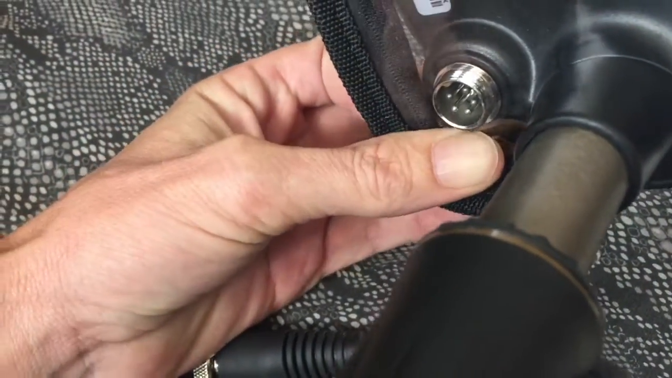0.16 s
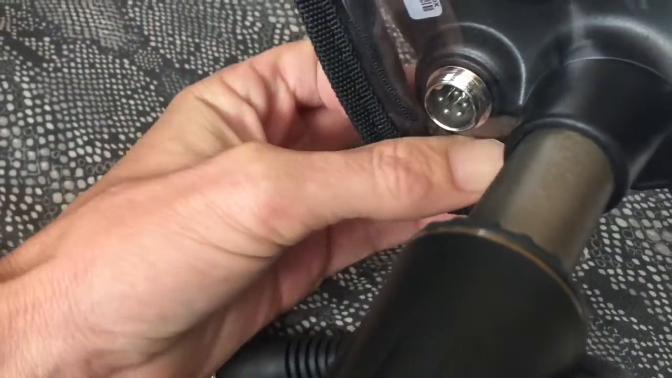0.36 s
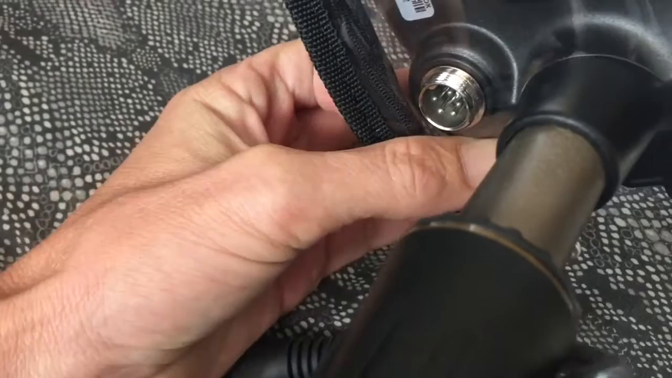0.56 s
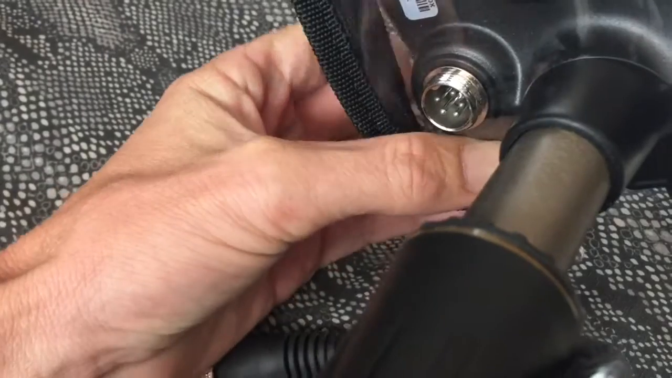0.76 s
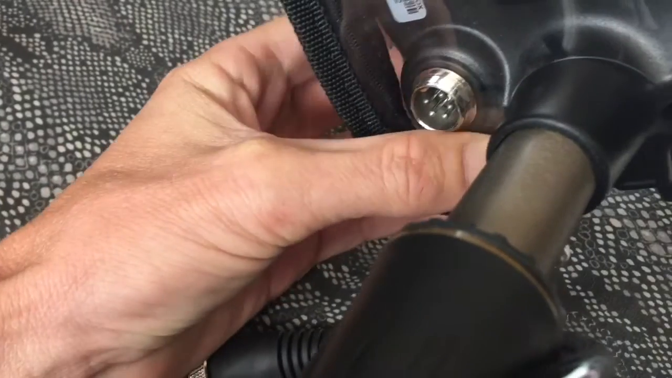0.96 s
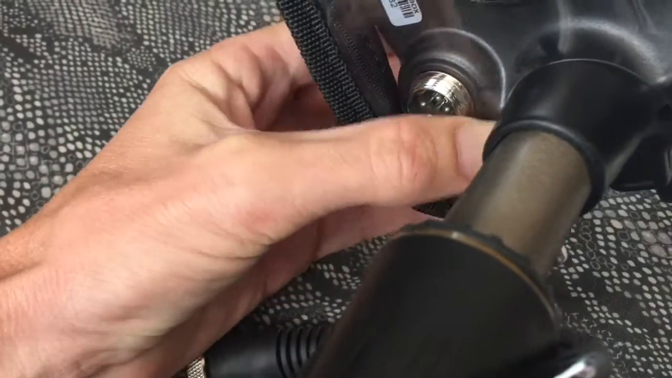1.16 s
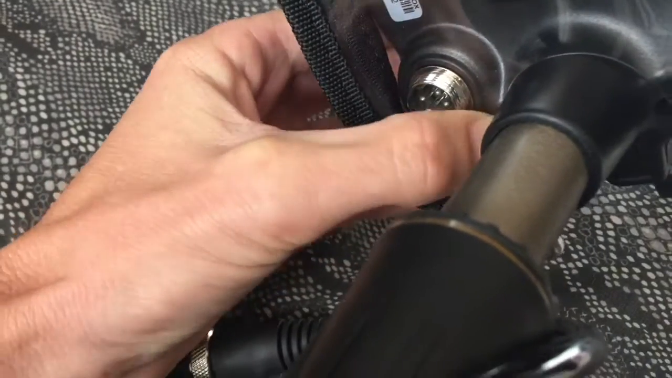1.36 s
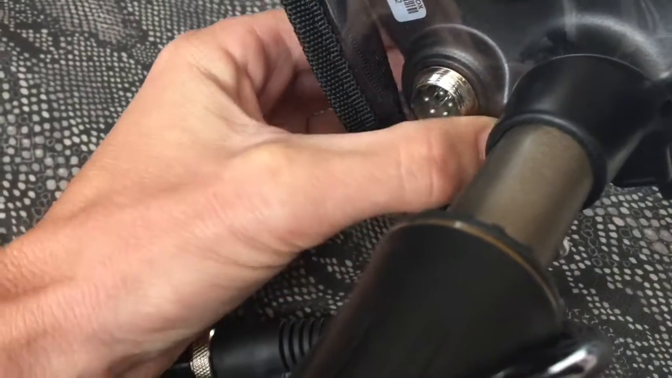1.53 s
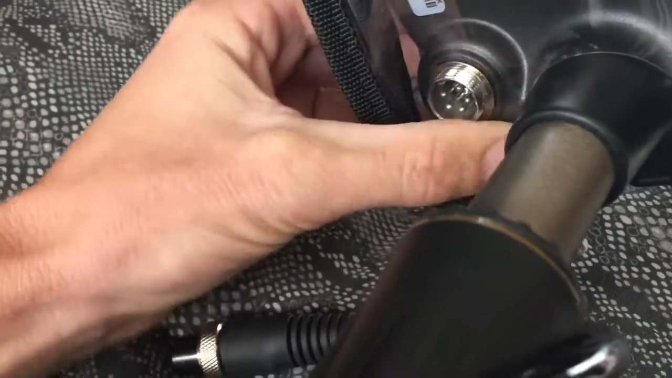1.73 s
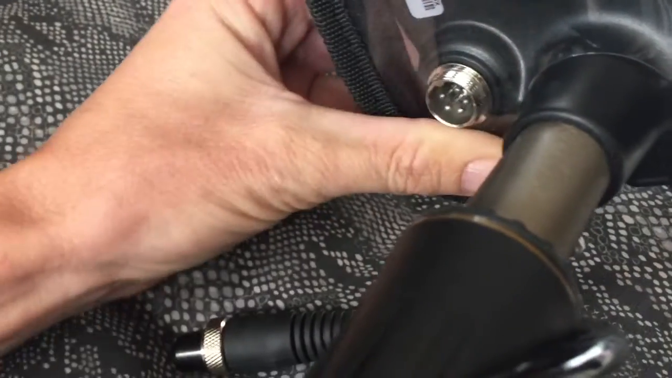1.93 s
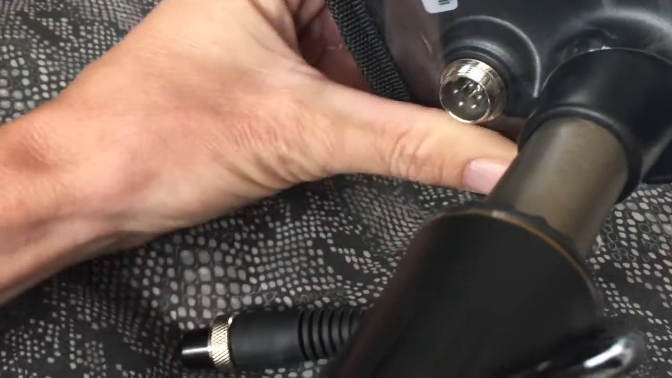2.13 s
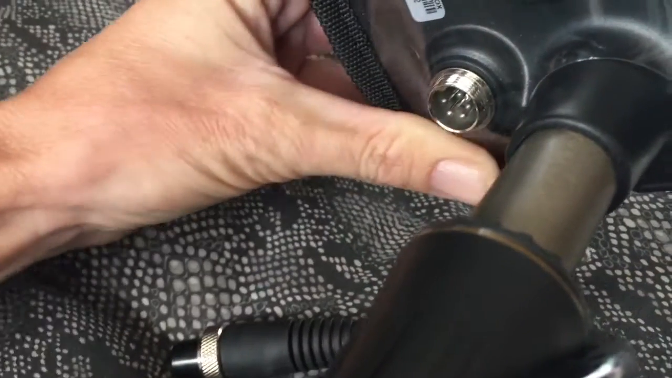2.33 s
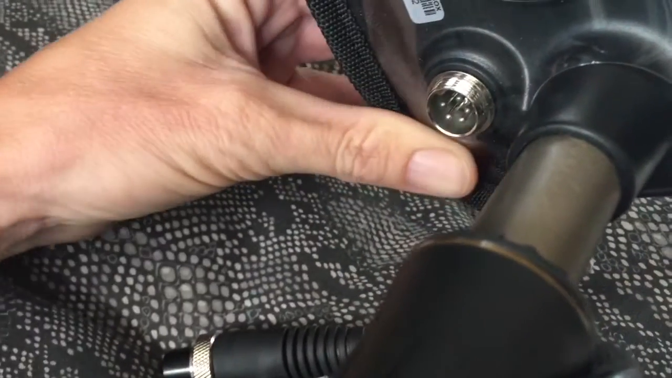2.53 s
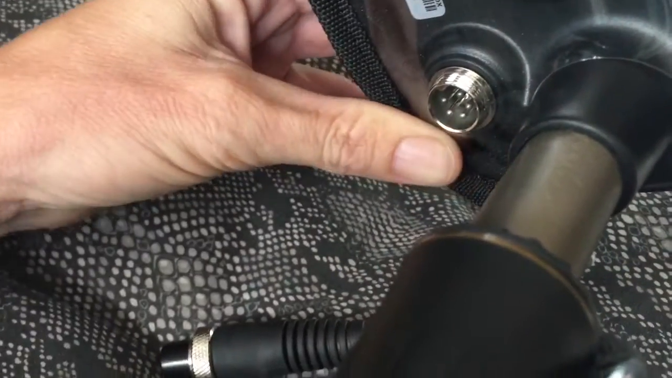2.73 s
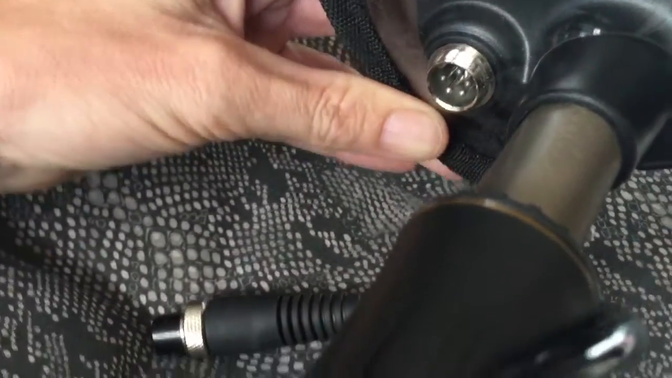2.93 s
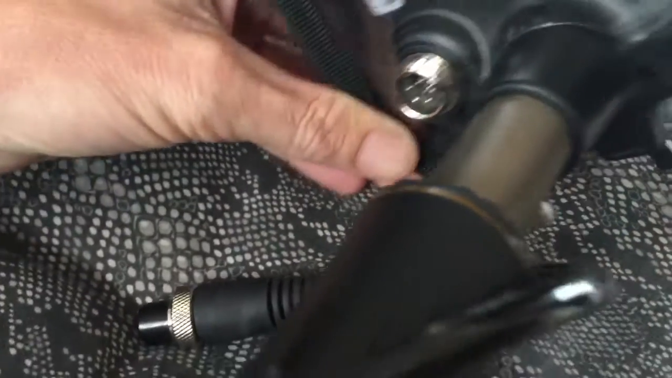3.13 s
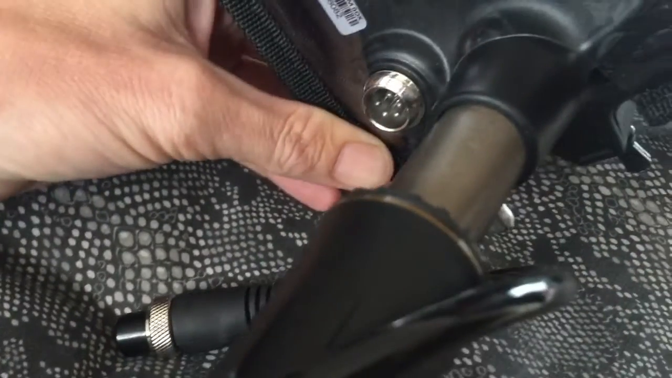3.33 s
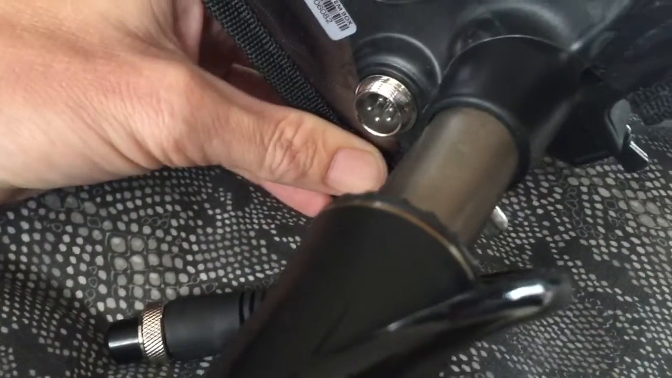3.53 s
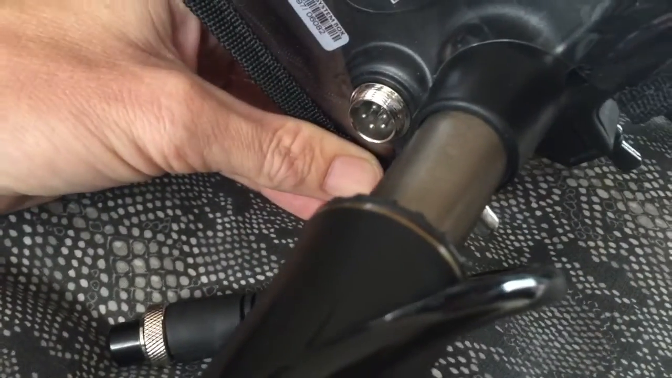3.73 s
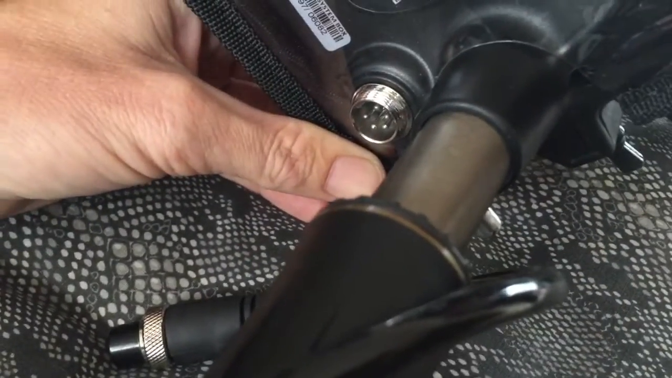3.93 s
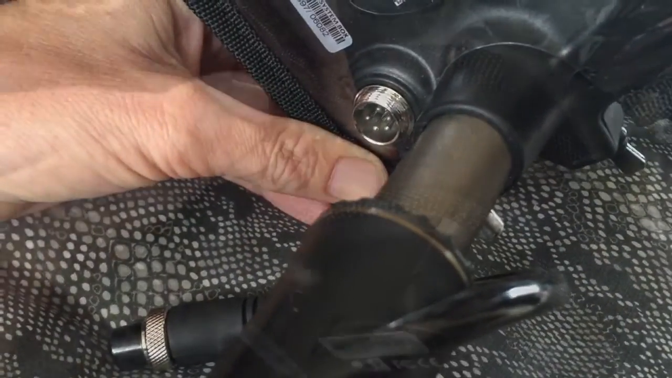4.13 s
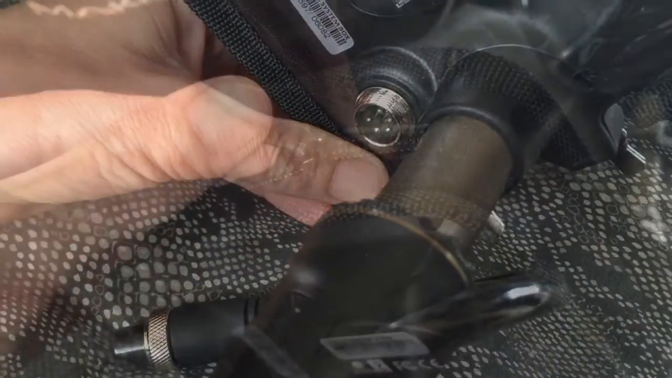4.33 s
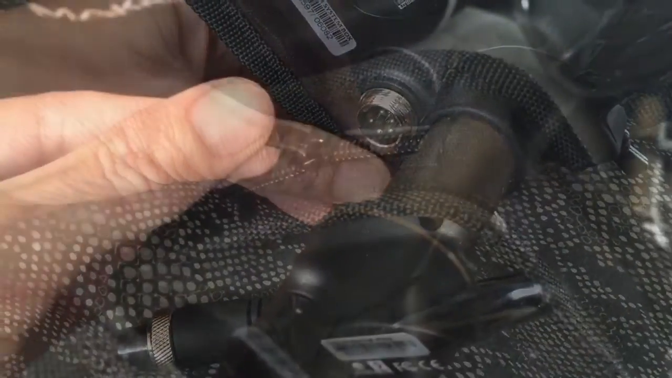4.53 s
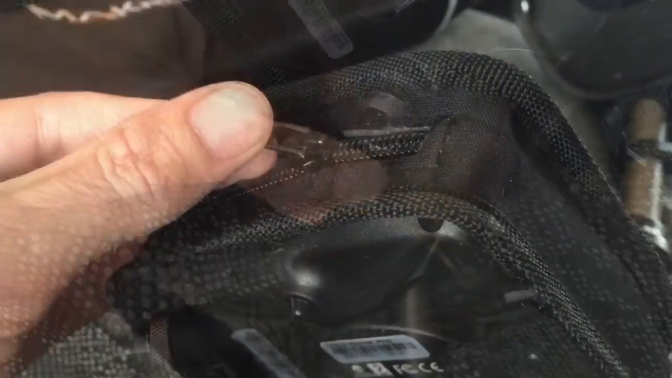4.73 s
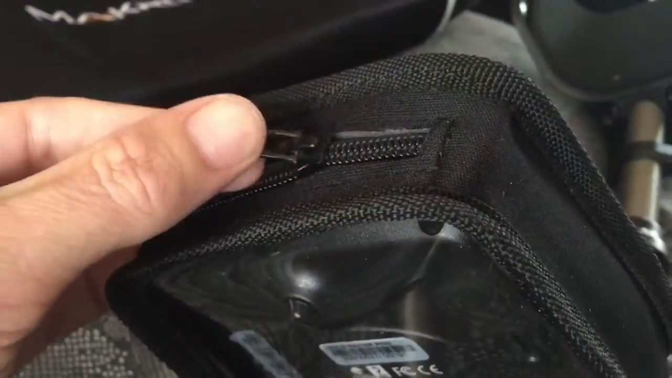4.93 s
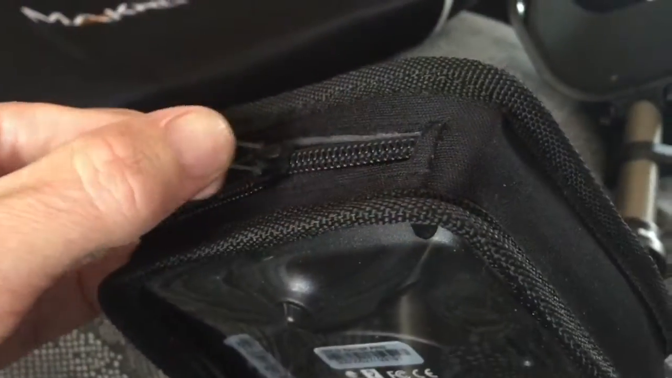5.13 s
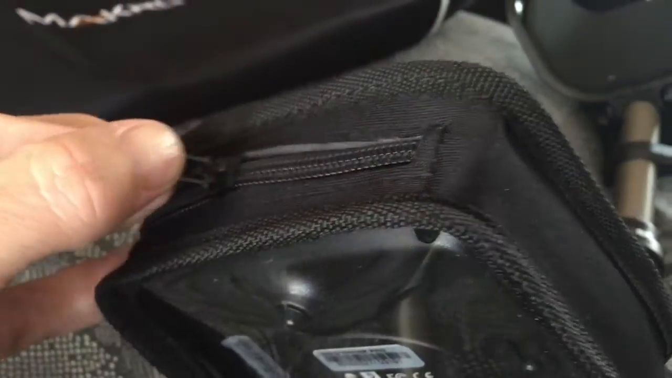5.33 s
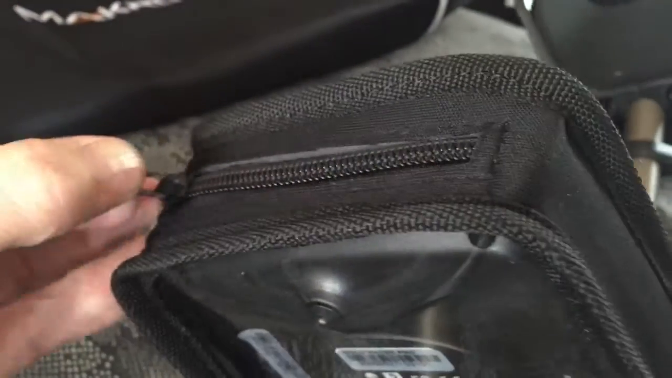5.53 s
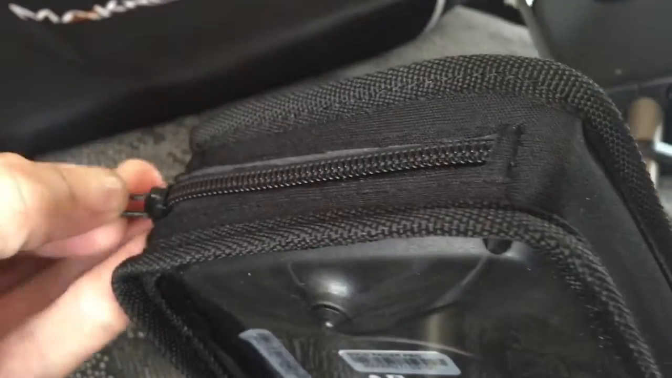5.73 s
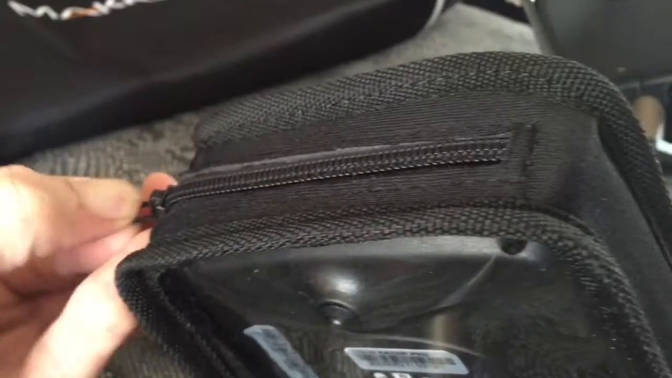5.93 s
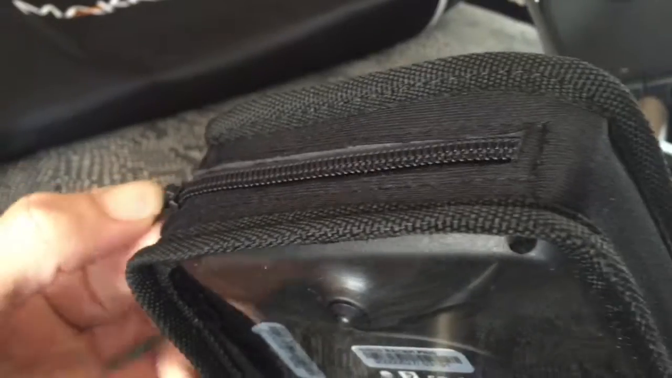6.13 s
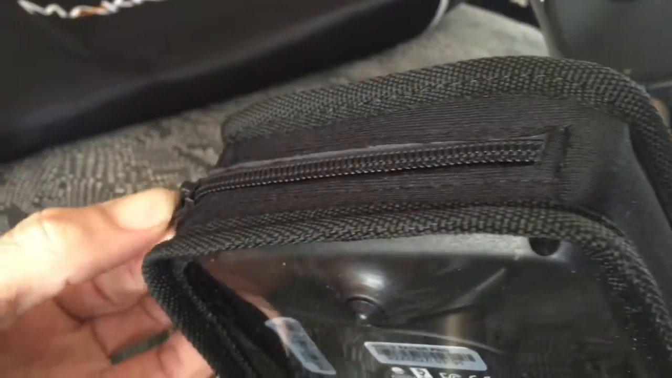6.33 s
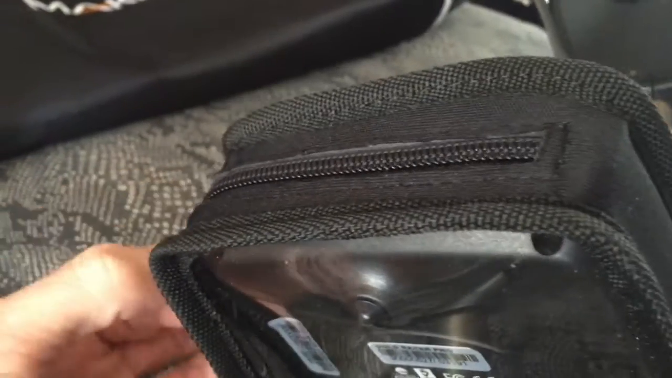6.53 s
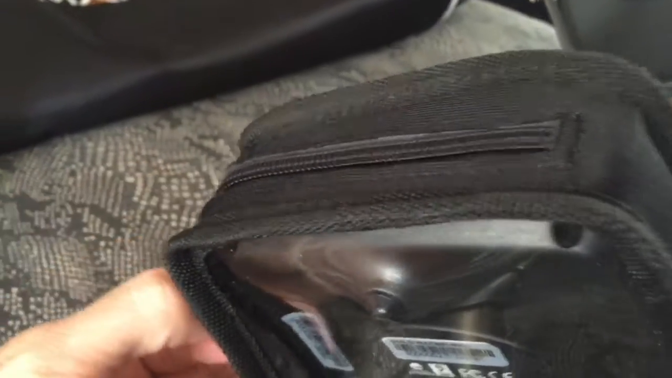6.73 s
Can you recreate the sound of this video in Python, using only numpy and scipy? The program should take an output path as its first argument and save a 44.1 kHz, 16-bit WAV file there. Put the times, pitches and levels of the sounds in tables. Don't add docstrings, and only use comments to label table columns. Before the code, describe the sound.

In a quiet room, hands tick and snap stiff plastic, then a zipper slider clicks tooth by tooth and rasps in brief runs.

```python
import sys
import numpy as np
from scipy import signal
from scipy.fft import rfft, irfft
from scipy.io import wavfile
from scipy.ndimage import uniform_filter1d, map_coordinates

SR = 44100
rng = np.random.default_rng(int(sys.argv[2]) if len(sys.argv) > 2 else 0)


def master_out(mix):
    frames = np.transpose(np.atleast_2d(mix))
    ceiling = np.clip(frames, -1, 1)
    pcm = np.round(ceiling * 32767).astype(np.int16)
    wavfile.write(sys.argv[1], SR, pcm)


def gain_from_decibels(decibels):
    exponent = np.asarray(decibels, float) / 20
    return 10 ** exponent


N = 303252

# hz, level_db_per_hz
RUMBLE_SPECTRUM = [(15, -48.5), (25, -8), (94, 0.5), (151, -6), (173, -8.5), (230, -12), (383, -19.5),
                   (432, -22.5), (502, -38.5), (900, -32.5), (1170, -55.5), (1980, -120)]
# at_s, level_db
RUMBLE_LEVEL = [(0.0, -60.5), (0.4, -55.5), (0.55, -62.5), (0.98, -60), (1.11, -65.5), (1.51, -62),
                (1.97, -64.5), (2.54, -63), (3.81, -63), (4.65, -68.5), (5.09, -66), (5.22, -61.5),
                (5.51, -69), (5.63, -56), (5.78, -63.5), (6.49, -68.5), (6.62, -59), (6.87, -57.5)]
# hz, level_db_per_hz
HISS_SPECTRUM = [(200, 2), (600, 7.5), (2600, 0.5), (4200, -1), (4900, -1), (6000, -2.5), (9000, -9),
                 (10400, -7.5), (12000, -10), (15200, -11), (16000, -33.5)]
# at_s, level_db
HISS_LEVEL = [(0, -68.5), (.4, -66.5), (.65, -67.5), (1.3, -67.5), (1.7, -65.5), (2.1, -60.5), (2.6, -65.5),
              (3.0, -66), (3.31, -65), (3.35, -68), (4.2, -70), (4.35, -74), (4.85, -72), (5.0, -67.5),
              (5.5, -59), (5.9, -68), (6.3, -65.5), (6.88, -63.5)]
# at_s, level_db, pitch_hz
WHISTLE = [(0, -72, 1558), (.08, -69, 1560), (.1, -77, 1565), (.13, -58.5, 1570), (.155, -78, 1565),
           (.18, -60.5, 1567), (.24, -71, 1567), (.26, -74, 1568), (.3, -69, 1570), (.5, -64, 1570),
           (.66, -76, 1563), (.78, -76, 1569), (.86, -82.5, 1563), (2.4, -82, 1613), (2.75, -79, 1605),
           (2.98, -71, 1620), (3.03, -91, 1610)]

# peak_s, rise_s, fall_s, level_db, centre_hz
RUBS = [(.285, 0.018, 0.016, -55, 2490), (.41, 0.041, 0.1, -53.5, 2550), (.497, 0.0069, 0.059, -57.5, 2180),
        (1.03, 0.05, 0.022, -67, 2600), (1.21, 0.039, 0.026, -67, 2000), (1.385, 0.02, 0.024, -63, 1150),
        (1.496, 0.015, 0.017, -52.5, 1290), (1.72, 0.017, 0.086, -64.5, 1260),
        (1.79, 0.015, 0.016, -57, 2010), (2.1, 0.17, 0.15, -61, 1913), (2.18, 0.011, 0.025, -64, 4000),
        (2.3, 0.029, 0.037, -64, 2000), (2.42, 0.027, 0.027, -52, 1900), (2.56, 0.044, 0.04, -66, 1770),
        (2.67, 0.042, 0.044, -65.5, 1770), (3.08, 0.013, 0.04, -64, 685), (3.19, 0.09, 0.032, -64, 1000),
        (3.31, 0.063, 0.01, -76.5, 1230)]
# peak_s, rise_s, fall_s, level_db, centre_hz
DRAGS = [(5.48, 0.052, 0.063, -46.5, 1010), (6.023, 0.016, 0.033, -63, 2830),
         (6.12, 0.11, 0.028, -63.5, 1770), (6.162, 0.016, 0.0093, -39.5, 1730),
         (6.264, 0.013, 0.018, -38.5, 2430), (6.352, 0.004, 0.004, -68, 2510),
         (6.238, 0.0021, 0.0087, -50, 1500), (6.472, 0.033, 0.054, -39.5, 1010),
         (6.585, 0.025, 0.057, -54.5, 1200), (6.754, 0.014, 0.004, -32, 1950)]
# peak_s, rise_s, fall_s, level_db, centre_hz
CREAKS = [(0.45, 0.004, 0.021, -50, 420), (.433, .003, 0.0086, -43.5, 420), (.433, .003, .011, -40, 200),
          (1.79, .012, .012, -57, 1400), (2.1, 0.0045, .005, -62, 1100), (3.08, 0.024, 0.031, -67, 870),
          (3.16, 0.022, .03, -68, 2640), (5.6, .004, 0.025, -54, 400), (0.55, 0.034, 0.026, -48.5, 88),
          (.806, 0.011, 0.015, -57, 4600), (0.884, 0.021, 0.012, -41, 2300),
          (0.01, 0.022, 0.018, -59.5, 420), (0.884, .03, 0.034, -58.5, 290), (1.11, .06, 0.12, -68.5, 280),
          (2.72, 0.029, 0.088, -70, 360), (3.07, 0.023, 0.051, -62.5, 660), (3.17, 0.035, 0.055, -70, 850),
          (5.3, 0.0048, 0.028, -43, 200), (5.25, 0.019, 0.026, -50.5, 270), (5.3, 0.0059, 0.011, -48, 370),
          (5.48, 0.067, 0.058, -46, 410), (3.06, 0.32, 0.93, -69.5, 290),
          (6.165, 0.0058, 0.016, -46.5, 630), (6.269, 0.011, 0.019, -44.5, 740),
          (6.25, 0.06, 0.067, -55.5, 142)]
# peak_s, rise_s, fall_s, level_db, centre_hz
SWISHES = [(.12, .04, 0.03, -74, 6000), (.285, 0.015, .012, -65, 8800), (.42, 0.066, 0.084, -62.5, 8700),
           (.886, 0.012, .009, -55.5, 9000), (1.79, .012, 0.015, -57, 9600),
           (2.42, 0.022, 0.023, -62, 8850), (6.168, 0.0048, 0.0059, -54, 6000),
           (6.245, .004, .02, -63, 6000)]
# peak_s, rise_s, fall_s, level_db, centre_hz
SQUEAKS = [(.878, 0.018, 0.01, -51, 2300), (1.725, .015, 0.028, -61, 1100), (1.79, .012, 0.012, -58, 1150),
           (1.79, 0.011, 0.011, -64, 3700), (.88, 0.014, .01, -47.5, 1820), (.885, 0.014, 0.01, -48, 4970),
           (.885, .024, .009, -58, 8400), (.802, .004, 0.0071, -60, 5930), (1.372, 0.011, .008, -63, 2200),
           (1.375, .012, .008, -64, 1480), (1.498, 0.0043, .003, -61, 3500),
           (3.104, 0.0037, 0.005, -59, 1520), (3.115, .004, .004, -66, 1800),
           (3.174, .004, .004, -68, 1850), (1.526, .003, .003, -59.5, 4170),
           (6.022, 0.0043, 0.035, -63, 4100)]

# at_s, crack_db, panel_rel_db, slider_rel_db, hollow_rel_db, treble_db
SNAPS = [
    (.018, -57, 10.5, 3.5, -11, -17),
    (.4289, -15, -14, -10, -25, -5),
    (1.9530, -34.5, -0.5, -5.5, -21, -10),
    (2.1612, -11, -18.5, -10, -42, -1.5),
]
# at_s, crack_db, panel_rel_db, slider_rel_db, contact_ms
TICKS = [(0.415, -43, -4, -20, 1.2), (0.283, -47.5, -10, -11, 2), (0.4688, -46, -20, -15, 1.9),
         (0.554, -47, -13, -12, 3.45), (0.568, -45, -25, -16, 2.4), (0.728, -59, -21, -23, 0.49),
         (0.762, -51, -5.5, -10, 0.38), (0.8107, -51.5, -13, -14, 1.6), (0.846, -40.5, -10, -33, 0.57),
         (0.883, -40, -4.5, -31, 0.42), (1.0543, -58, -1, 5.5, 1.5), (1.3914, -54.5, 1.5, 6.5, 1.53),
         (1.5013, -37, -1.5, -12, 1.14), (1.3827, -68, 20, 18, 1), (1.418, -68, 7, 6, 0.77),
         (1.466, -62.5, 6, -1, 1.1), (3.2022, -60.5, 4, 2, 1), (5.001, -67, 2, 3, 1.3),
         (.229, -69, -7, -13, .5), (.353, -53, -18, -20, .5), (0.527, -47, -8, -4, 0.91),
         (2.1142, -47.5, -9, 0, 0.65), (2.135, -39, -16, -9, 0.95), (2.2238, -60, 10.5, -10, 1),
         (2.233, -62, 8, -3, 1.2), (2.378, -59.5, 10.5, 10, 1.25), (2.799, -69, 10, -8, 0.65),
         (3.609, -53.5, -22, -14, 0.5)]
# at_s, level_db, pitch_hz
THUMPS = [(1.53, -50.5, 122), (5.323, -40, 133), (5.776, -46, 128.2), (5.826, -52.5, 127),
          (5.959, -50, 121), (6.029, -50, 129), (6.163, -37.5, 123), (6.285, -51, 130), (6.461, -59, 130)]
# at_s,
# scrape_db, panel_rel_db, slider_rel_db, hollow_rel_db
TEETH = [(4.918, -52, 0, -7, -9), (4.9429, -46.5, -1.5, -1, -7), (4.975, -39, -15.5, -31, -35),
         (5.1356, -19.5, -11, -15, -33), (5.1605, -42, -6, -3, -14), (5.2118, -33.5, -6, 2.5, -17),
         (5.6613, -34, -5, 3, -14), (5.6875, -29.5, -6, -32, -22), (5.7649, -42, 1, 2.5, -4.5),
         (5.8176, -48, -1, 3, -2.5), (5.9566, -58.5, 14.5, 12, 4), (5.9968, -33.5, -13, -6, -37),
         (6.0214, -50, -29, -8, -8), (6.1169, -59.5, 4, 8, 7), (6.1554, -22.5, -22, -32, -16.5),
         (6.2238, -50.5, -11, 7.5, -30), (6.3854, -26, -20, -11, -51), (6.4286, -36, 7, 1, -36),
         (6.4435, -47, 14, 15, 0.5), (6.658, -43, -2, 3, -7), (6.6718, -30, -0.5, -16, -17),
         (6.7027, -33, 3, -15, -9), (6.7195, -33, 2, 1, -16), (6.7332, -25, -5.5, -25, -38),
         (5.0524, -43.5, 0, 0.5, -10), (5.0593, -43, -4, -3, -6), (5.071, -47, 0, -2, -5),
              (5.088, -43, 2, -10, -10), (5.2302, -39, 1.5, 2, -16), (5.2514, -36.5, -3, -1, -15),
              (5.2695, -52, -2, -5, -10), (5.2942, -32.5, -7, -2.5, -8), (5.3051, -30.5, -8, -6.5, -7.5),
              (5.3132, -32, -1, -2.5, -21), (5.3785, -30.5, -23, -2, -6), (5.3883, -32.5, -5.5, -4, -8),
              (5.4009, -33.5, -6, -4, -24), (5.4135, -30.5, -11, -3, -12),
              (5.4235, -29.5, -14, -1.5, -10.5), (5.432, -33.5, -8, -3, 0), (5.4436, -32, -4.5, -2, -10),
              (5.4535, -33.5, -7, 2, -6), (5.46, -30.5, -11, -0.5, -11), (5.4661, -32, -12, 3, -16),
              (5.473, -37, -7, 6.5, -3), (5.4809, -35.5, -10, 5, -10), (5.4906, -35, -6, 2, 0),
              (5.498, -32, -10, 0, -22), (5.5061, -34.5, -20, 4, -19), (5.515, -37.5, -14, 5, 0.5),
              (5.5264, -36, -1, 0, -4), (5.5354, -30.5, -12, -5, -18), (5.5436, -28.5, -5, -12, -18),
              (5.553, -31, -11, -0.5, -11), (5.5632, -29.5, -3, -3, -13), (5.572, -32.5, -9, -1, -7.5),
              (5.6025, -29.5, -7, -5.5, -13), (5.6086, -32.5, -2, -4, -16), (5.6283, -42.5, -7, 7, -16),
              (5.6344, -39, -9, -2, -12), (5.71, -39, -12, -9, -11), (5.716, -46, -7, -2, -4),
         (6.4327, -47, 5, 11, -17), (6.4518, -38, 6.5, 8.5, -22), (6.4599, -33.5, 3, -1, -14),
               (6.4661, -43, 13, 5, -12), (6.4733, -33.5, 5.5, -9, -9), (6.4823, -27.5, -3, -14, -18),
               (6.4887, -35, -2, -5, -13), (6.4973, -33, -1, -6, -16), (6.506, -32.5, 0.5, 2, -9),
               (6.5161, -41.5, 1, 5.5, -4), (6.5228, -39, 0, -13, -2), (6.5321, -45, 9, -3, -1.5),
               (6.547, -53, 7, -4, -8), (6.5544, -35.5, -3.5, 3.5, -27), (6.5605, -37, 5, -11, -9),
               (6.5702, -36.5, 3, -8, -23), (6.5754, -57, 0, 2, 5), (6.591, -51.5, -3, -5, 4),
               (6.5945, -53, 6, -9, -14), (6.6024, -53, 1, -10, -17), (6.6112, -36.5, -4, 0.5, -25),
               (6.6258, -37.5, -2.5, -1.5, -19), (6.6767, -41.5, -3, -3, -15), (6.7085, -42.5, 8.5, -1, -6),
               (6.7242, -34, 0, -8, -6), (6.7402, -23.5, -2, -10, -21), (6.7474, -26.5, 2.5, 0, -14),
               (6.7507, -30, 2, 0.5, -15), (6.7565, -31, -6, -7, -18), (6.763, -33, -3, -19, -8),
               (6.771, -30.5, 2, -11, -14), (6.779, -38, -5, -3, -24), (6.7858, -28, -0.5, -6, -25),
               (6.7945, -36, -3, -2, -18), (6.8004, -32.5, 3.5, -8, -30)]
# at_s, treble_tilt_db, panel_tilt_db
FACING = [(4.9, -7, -8), (5.051, 5, -33), (5.14, 5.5, -18), (5.3, 1.5, -20), (5.45, 3, -12),
          (5.6, -2.5, 15), (6.0, -5.5, 23), (6.3, -11, 2), (6.42, -3, 10), (6.88, -6, 10)]

# hz, width_hz, level_db
SCRAPE = [(2200, 1100, -7), (2680, 485, -1.5), (3840, 1210, -4), (4250, 1120, -2.5), (5560, 1300, -13),
          (6770, 590, -17), (8580, 620, -22.5), (11500, 1000, -23), (14730, 830, -27.5), (15900, 900, -30),
          (12500, 8000, -33)]
# hz, width_hz, level_db
CRACK = [(1900, 650, -4), (2750, 900, 4.5), (3700, 1700, 2), (5650, 1200, -4.5), (6850, 650, -9),
         (8400, 910, -16.5), (11300, 1500, -13.5), (14610, 1800, -16.5), (15910, 1200, -24.5)]
# hz, width_hz, level_db
PANEL = [(335, 100, -7), (460, 140, -5), (600, 150, 0), (745, 200, 7.5), (910, 130, 3), (1060, 200, 2)]
# hz, width_hz, level_db
SLIDER = [(1160, 130, 0.5), (1345, 340, 6), (1559, 270, 12), (1770, 440, 1.5)]
# hz, width_hz, level_db
HOLLOW = [(134.4, 12, -3), (226, 91, -7), (310, 150, -9)]
# hz, width_hz, level_db
GROAN = [(325, 50, 0), (430, 66, -7), (560, 50, -6.5), (707, 20, -0.5), (887, 21, -9), (1086, 46, -12),
         (1570, 71, -4), (2280, 170, -12), (3500, 680, -19)]
# hz, width_hz, depth_0_to_1
NOTCHES = [(4720, 3300, 0.37), (10500, 870, 0.5)]

LEAD_MS = 8
GIVE_DB = 11


def rms_one(x):
    return x / np.sqrt(np.mean(x ** 2) + 1e-20)


def in_time(rows):
    s, *columns = np.transpose(rows)
    return [np.interp(np.arange(N) / SR, s, column) for column in columns]


def drift(rate_hz):
    knots = rng.standard_normal(2000)
    return map_coordinates(knots, [np.arange(N) / SR * rate_hz + 2], order=3)


def coloured(spectrum):
    hz, level_db = np.transpose(spectrum)
    grid_hz = np.fft.rfftfreq(N, 1 / SR) + 1
    gain = gain_from_decibels(np.interp(np.log(grid_hz), np.log(hz), level_db, -90, -90))
    return rms_one(irfft(rfft(rng.standard_normal(N)) * gain, N))


def resonate(x, hz, width_hz):
    r = np.exp(-np.pi * width_hz / SR)
    zeros = [(1 - r * r) / 2, 0, (r * r - 1) / 2]
    poles = [1, -2 * r * np.cos(2 * np.pi * hz / SR), r * r]
    return signal.lfilter(zeros, poles, x)


def body(bursts, modes, window_ms, spread_db, treble_db=0, sign=-1):
    luck = rng.standard_normal((len(bursts), len(modes)))
    rung = 0
    for k, (hz, width_hz, level_db) in enumerate(modes):
        tilt_db = treble_db * np.log2(hz / 3000) / 2
        strength_db = level_db + spread_db * luck[:, k] + tilt_db
        rung = rung + sign ** k * gain_from_decibels(strength_db)[:, None] * resonate(bursts, hz, width_hz)
    power = uniform_filter1d(rung ** 2, size=int(window_ms * SR / 1000), axis=1)
    return rung / np.sqrt(power.max(axis=1, keepdims=True))


def contact_time(contact_ms):
    after_ms = np.arange(int(0.15 * SR)) / SR * 1000 - LEAD_MS
    return after_ms, after_ms / contact_ms[:, None]


def ring_bodies(rows, bright, bursts, push, panel_tilt_db=0):
    at_s, level_db, panel_db, slider_db, hollow_db = np.transpose(rows)[:5]
    sound = gain_from_decibels(-4.0) * bright
    sound += gain_from_decibels(panel_db - 3)[:, None] * body(bursts, PANEL, 5, 3, panel_tilt_db)
    sound += gain_from_decibels(slider_db - 3)[:, None] * body(bursts, SLIDER, 4, 3)
    sound += gain_from_decibels(hollow_db - 1.0)[:, None] * body(push, HOLLOW, 3.3, 1.0)
    length = sound.shape[1]
    out = np.zeros(N + length)
    where = ((at_s - LEAD_MS / 1000) * SR).astype(int)[:, None] + np.arange(length)
    np.add.at(out, where, gain_from_decibels(level_db)[:, None] * sound)
    return out[:N]


def scraping_contacts(rows, contact_ms, treble_db=0, panel_tilt_db=0, give_db=GIVE_DB):
    after_ms, t = contact_time(contact_ms)
    push = np.exp(-((t - 0.6) / np.where(t < 0.6, 0.36, 0.82)) ** 2) + 1e-9
    shiver = np.where(t < 0, np.exp(after_ms / 0.8), np.exp(-after_ms / 5.5))
    grit = rng.standard_normal(t.shape) * gain_from_decibels(2 * rng.standard_normal(t.shape))
    grit[np.arange(len(t)), np.abs(t - 0.45).argmin(axis=1)] = gain_from_decibels(give_db)
    sharp = (push + gain_from_decibels(-26) * shiver) * grit
    bursts = (push + gain_from_decibels(-8.5) * shiver) * grit
    bright = body(sharp, SCRAPE, 1.7, 1.3, treble_db)
    return ring_bodies(rows, bright, bursts, push, panel_tilt_db)


def background():
    rumble_db, = in_time(RUMBLE_LEVEL)
    rumble = gain_from_decibels(rumble_db + 2.5 + 1.6 * drift(14)) * coloured(RUMBLE_SPECTRUM)
    hiss_db, = in_time(HISS_LEVEL)
    hiss = gain_from_decibels(hiss_db + 0.18 * drift(26)) * coloured(HISS_SPECTRUM)
    whistle_db, whistle_hz = in_time(WHISTLE)
    wander_hz = 11 * drift(40)
    turns = np.cumsum(whistle_hz + wander_hz) / SR
    whistle = gain_from_decibels(whistle_db + 1.5 * drift(40)) * np.sin(2 * np.pi * turns)
    return rumble + hiss + whistle


def rubs():
    out, t = np.zeros(N), np.arange(N) / SR
    grit = rng.standard_normal(N) * gain_from_decibels(4 * drift(300))
    modes = PANEL + SLIDER + SCRAPE
    rung = sum(gain_from_decibels(db) * resonate(grit, hz, width_hz) for hz, width_hz, db in modes)
    cloth = grit + gain_from_decibels(-9.5) * rung
    kinds = [(RUBS, 1.88), (DRAGS, 2.3), (CREAKS, 0.43), (SWISHES, 1.4), (SQUEAKS, 0.13)]
    for rows, relative_width in kinds:
        for peak_s, rise_s, fall_s, level_db, hz in rows:
            width_hz = relative_width * hz
            start = max(int((peak_s - 4 * rise_s) * SR), 0)
            part = slice(start, int((peak_s + 4 * fall_s) * SR))
            slope_s = np.where(t[part] < peak_s, rise_s, fall_s)
            swell = np.exp(-((t[part] - peak_s) / slope_s) ** 2)
            band = resonate(resonate(cloth[part], hz, width_hz), hz, 2 * width_hz)
            out[part] += gain_from_decibels(level_db) * swell * rms_one(band)
    return out


def snaps():
    after_ms, t = contact_time(np.full(len(SNAPS), 0.045))
    push = np.exp(-((t - 0.6) / 0.61) ** 2) + 1e-9
    grit = rng.standard_normal(t.shape) * gain_from_decibels(2 * rng.standard_normal(t.shape))
    rattle = gain_from_decibels(-24.5) * (t > 0) * np.exp(np.minimum(-after_ms, 0) / 1.7) * grit
    sharp = np.gradient(push, axis=1) + rattle
    treble_db = np.transpose(SNAPS)[5]
    bright = body(sharp, CRACK, 1.7, 1.3, treble_db, sign=1)
    return ring_bodies(SNAPS, bright, push, push)


def ticks():
    *columns, contact_ms = np.transpose(TICKS)
    hollow_db = -34.5 + 10.5 * contact_ms
    rows = np.transpose([*columns, hollow_db])
    return scraping_contacts(rows, np.maximum(contact_ms, 0.05))


def steadied(x):
    return x / np.sqrt(uniform_filter1d(x ** 2, size=500) + 1e-3 * np.mean(x ** 2))


def groan():
    start_s, end_s, level_db, fade_db = 0.488, 0.568, -44, 6
    slips_per_s, slow_by, slip_sharpness = 130, 0.32, 1.6
    along = (np.arange(N) / SR - start_s) / (end_s - start_s)
    held = np.clip(np.minimum(along / 0.091, (1 - along) / 0.08), 0, 1)
    slips = slips_per_s * (end_s - start_s) * along * (1 - slow_by * along / 2)
    slips = slips + 0.08 * drift(90)
    noise = rng.standard_normal(N) * np.exp(-slip_sharpness * (slips % 1))
    sung = np.zeros(N)
    for hz, width_hz, mode_db in GROAN:
        ring = resonate(resonate(noise, hz, width_hz), hz, 3.1 * width_hz)
        sung += gain_from_decibels(mode_db) * steadied(ring)
    return gain_from_decibels(level_db - fade_db * np.clip(along, 0, 1)) * held * rms_one(sung)


def thumps():
    push_ms, width_hz = 4.16, 9.4
    out, t = np.zeros(N), np.arange(int(0.2 * SR)) / SR
    push = np.exp(-((t * 1000 / push_ms - 2) ** 2))
    for at_s, level_db, hz in THUMPS:
        boom = resonate(push, hz, width_hz)
        out[int(at_s * SR):][:len(t)] += gain_from_decibels(level_db) * boom / np.abs(boom).max()
    return out


def zipper():
    tooth_ms, shorter_db_per_s, harder_db_per_s = 2.7, 1.6, 5
    teeth = np.array(TEETH)
    at_s, level_db = teeth.T[:2]
    contact_ms = tooth_ms * gain_from_decibels(rng.standard_normal(len(teeth)))
    contact_ms = contact_ms * gain_from_decibels(-shorter_db_per_s * (at_s - 5.5))
    facing_s, facing_treble_db, facing_panel_db = np.transpose(FACING)
    treble_db = np.interp(at_s, facing_s, facing_treble_db)
    treble_db = treble_db + 0.28 * np.minimum(level_db + 35.0, 0)
    panel_tilt_db = np.interp(at_s, facing_s, facing_panel_db)
    give_db = GIVE_DB + harder_db_per_s * (at_s - 6)
    return scraping_contacts(teeth, contact_ms, treble_db, panel_tilt_db, give_db)


def tail(x):
    level_db, t60_s = -24.5, 0.13
    t = np.arange(int(0.2 * SR)) / SR
    wash = rng.standard_normal(len(t)) * gain_from_decibels(-60 * t / t60_s) * (t > 0.003)
    wash = resonate(wash, 1300, 3000)
    return gain_from_decibels(level_db) * signal.fftconvolve(x, wash / np.sqrt(np.sum(wash ** 2)))[:N]


def scene():
    near = rubs() + snaps() + ticks() + groan() + thumps() + zipper()
    return (background() + near + tail(near))[None]


def low_pass(x):
    return signal.sosfilt(signal.butter(12, 16870, fs=SR, output="sos"), x)


def record(dry):
    x = signal.sosfilt(signal.butter(3, 42, "high", fs=SR, output="sos"), dry)
    for hz, width_hz, depth in NOTCHES:
        x = x - depth * resonate(x, hz, width_hz)
    x = signal.sosfilt(signal.cheby2(12, 70, 17250, fs=SR, output="sos"), x)
    return low_pass(x)


dry = scene()
out = record(dry)
master_out(out)
```